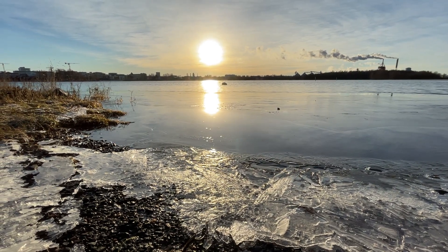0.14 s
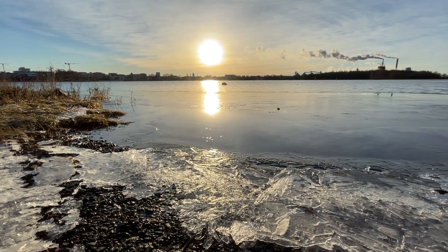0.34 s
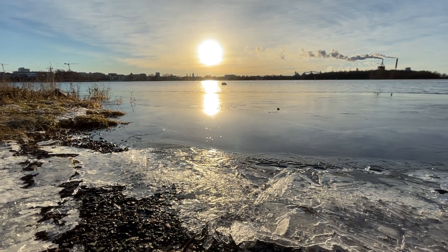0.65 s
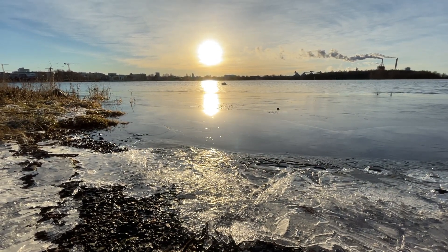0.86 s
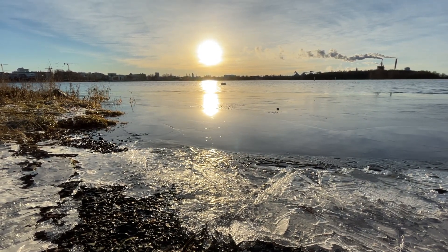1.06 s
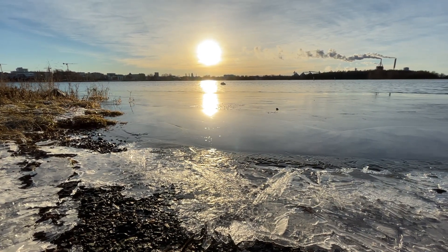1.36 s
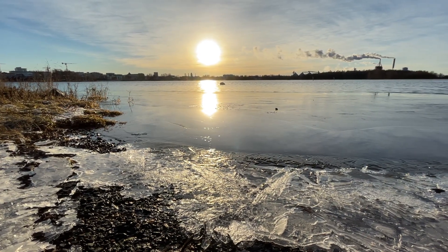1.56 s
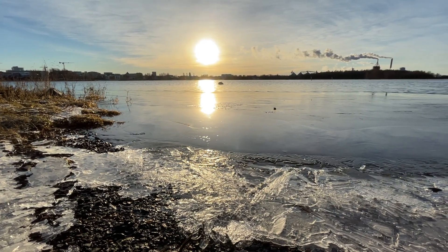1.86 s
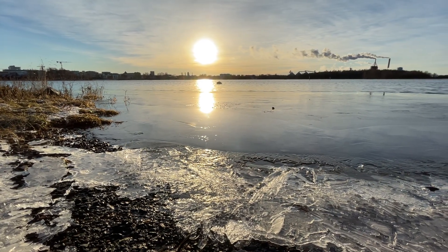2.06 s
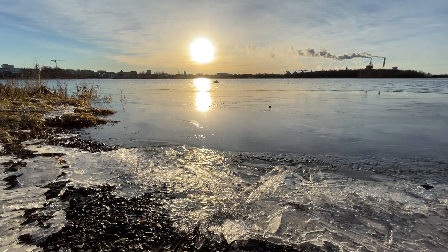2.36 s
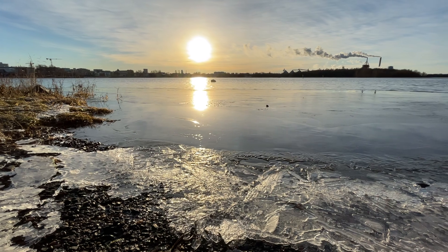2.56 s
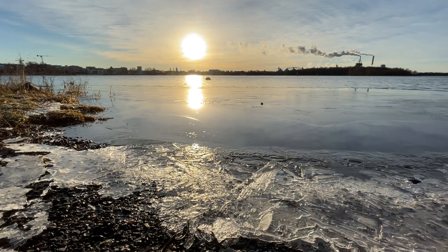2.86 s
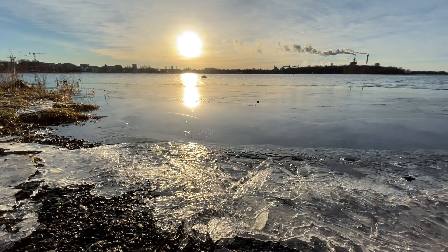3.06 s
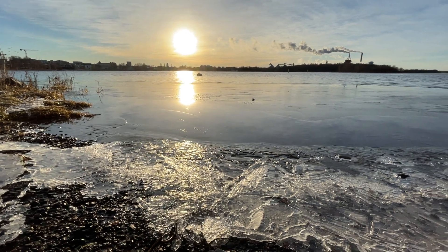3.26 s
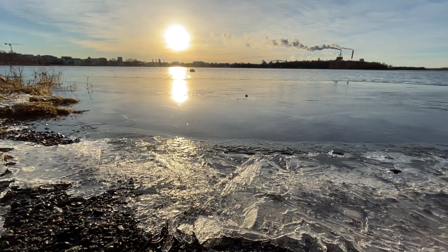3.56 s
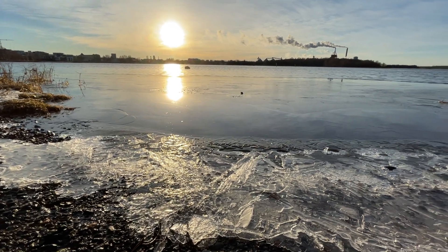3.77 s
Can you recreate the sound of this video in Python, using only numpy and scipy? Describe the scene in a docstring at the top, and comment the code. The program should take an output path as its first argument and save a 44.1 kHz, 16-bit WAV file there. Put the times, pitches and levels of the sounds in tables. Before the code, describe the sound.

Crackling sheet ice, heard close in wide stereo on an open shore: a delicate glassy fizz, then frequent brittle snaps, small bubbles and gurgles underneath, a bright plip near the end, low distant rumble behind.

```python
"""A fizzing wash of tiny ice ticks runs throughout, rising and falling as low swells lift thin ice along a shore.
Plates crack over it in bursts of a few milliseconds, shaped from noise in three ranges: body, snap and sparkle.
Air pockets plip, bubble and gurgle as short decaying sines under the ice.
Behind them lie a soft slosh, a faint two-tone hum and a low rumble of wind and distance, made of filtered noise
and wavering sines."""
import sys
import numpy as np
from scipy import signal
from scipy.fft import rfft, irfft
from scipy.io import wavfile
from scipy.ndimage import uniform_filter1d

SR = 44100
rng = np.random.default_rng(int(sys.argv[2]) if len(sys.argv) > 2 else 0)


def generate_wav(sig):
    """Save sig (samples, or channels by samples) to the path in sys.argv[1] as 16-bit PCM at SR."""
    pcm = np.round(np.clip(np.atleast_2d(sig).T, -1, 1) * 32767).astype(np.int16)
    wavfile.write(sys.argv[1], SR, pcm)


N = 172872  # length in samples

# In spectra, level/dB is relative density per Hz: colour() sets the overall gain.
# Swell of the ice, before layer trims: t/s, treble level/dB, upper-mid level/dB
SWELL_LEVELS = [(0, -62, -72), (.09, -64, -68), (.155, -58, -67), (.22, -68.5, -72.5), (.38, -72, -77),
                (.52, -66.5, -68), (.67, -59.5, -68.5), (.85, -60, -67), (1.0, -65.5, -67.5),
                (1.35, -64.5, -66), (1.55, -67.5, -69.5), (1.68, -73, -72.5), (1.79, -80.5, -83),
                (1.88, -70.5, -74), (1.97, -72.5, -76), (2.15, -70.5, -75.5), (2.25, -65, -65),
                (2.42, -59, -61.5), (2.62, -62.5, -66), (2.93, -55.5, -63), (3.04, -61.5, -63.5),
                (3.12, -66.5, -65), (3.25, -63.5, -66.5), (3.5, -59.5, -62), (3.92, -60.5, -61.5)]
# Spectra of the wash of ticks, treble and upper mids: f/Hz, level/dB
WASH_TREBLE_SPECTRUM = [(2500, -17.5), (5000, -3), (6500, -1), (8000, 2), (9700, 1.5), (11500, -2.5),
                        (13000, -1), (14300, -16), (15500, -27)]
WASH_MID_SPECTRUM = [(400, -14), (950, 3.5), (1400, -0.5), (2350, 4), (2750, 1), (3300, 0), (4100, 0.5),
                     (4950, -2.5), (5500, -2.5), (7500, -17.5), (12000, -37)]
# Shared part of left and right in the ice noise: f/Hz, likeness (0-1)
ICE_LIKENESS = [(1500, 0.25), (3500, 0.25), (5300, 0.54), (8000, 0.15), (9400, 0.081), (11800, 1),
                (15000, 0.18)]
# Phase of the shared noise on the left against the right: f/Hz, phase/rad
LEFT_PHASE = [(0, 0), (1380, -2.5), (2330, -4.5), (4050, -7), (5340, -11), (6460, -7), (7410, -7),
              (8100, -3.5), (8440, -5), (9990, 2.2), (10500, 1.2), (12300, -2), (14500, -5.5)]
# Cracking plates: t/s, body level/dB, snap level/dB, sparkle level/dB
PLATE_CRACKS = [(0.0523, -75, -58, -63), (0.1075, -73, -56, -55), (0.4307, -77, -57.5, -60),
                (0.5172, -65, -60, -64), (0.66, -78, -69, -57), (0.736, -65, -63, -53),
                (0.9544, -64, -64, -61), (1.0558, -72, -65, -55), (1.0736, -70, -57, -65),
                (1.082, -54, -55, -62), (1.1435, -63, -56, -50), (1.1878, -65, -54.5, -64),
                (1.1977, -72, -68, -53.5), (1.2376, -57, -53, -62), (1.2487, -52, -48.5, -50.5),
                (1.301, -59.5, -55.5, -56), (1.3464, -56, -49, -58), (1.349, -50.5, -46, -54),
                (1.372, -56, -51, -55), (1.4415, -66, -54.5, -58.5), (1.498, -68, -51.5, -54),
                (1.526, -59.5, -61, -56.5), (1.5892, -59.5, -61, -63), (1.608, -70, -65, -62),
                (1.647, -62, -57, -60), (1.7277, -72, -65.5, -64), (1.757, -75, -70, -61.5),
                (1.7963, -64, -64, -64.5), (1.8718, -56, -69, -73), (1.9708, -63, -62, -63),
                (1.9804, -59, -61, -62.5), (1.991, -58.5, -58, -60), (2.1004, -69, -55, -63),
                (2.1856, -67, -54.5, -62), (2.2225, -59, -49, -60), (2.2379, -51, -49, -53),
                (2.2553, -73, -53, -51), (2.331, -70, -63, -57), (2.364, -56, -59, -51.5),
                (2.3923, -66, -51.5, -56), (2.43, -52, -52, -58), (2.5053, -50, -51.5, -51.5),
                (2.7875, -54, -52, -45.5), (2.8033, -65, -67, -59), (2.893, -66, -57, -48),
                (2.923, -63, -56, -52), (2.9801, -68, -48.5, -60), (2.9915, -66, -56, -51),
                (3.035, -66, -57, -48), (3.112, -74, -56, -58), (3.1237, -63, -48.5, -66),
                (3.333, -53, -53, -55.5), (3.3722, -73, -66, -52), (3.473, -67, -69, -55),
                (3.5284, -67, -60, -55), (3.5732, -55, -51, -58), (3.614, -49.5, -51, -59),
                (3.6563, -58, -48, -49), (3.673, -57, -54.5, -51), (3.688, -62, -62, -53),
                (3.8075, -56, -70, -62), (3.82, -56, -65, -53), (3.893, -52, -48.5, -48)]
# Spectra of the three ranges of a fracture: f/Hz, level/dB
BODY_SPECTRUM = [(220, -26), (480, 3.5), (1000, 1), (2000, -8), (3200, -16), (8000, -22)]
SNAP_SPECTRUM = [(1200, -13.5), (2800, -3), (4200, 1), (5800, 0), (8000, -14), (14000, -19)]
SPARKLE_SPECTRUM = [(3500, -29), (6500, 1), (9800, 2.5), (12500, -6), (14000, 1), (15500, -24)]
# Water plips under an edge: t/s, starting f/Hz, ring level/dB before rise and decay,
# decay to 1/e in cycles of the starting pitch, lag of the left side/ms
WATER_PLIPS = [(0.2236, 1730, -42, 3.4, -0.16), (1.3513, 925, -48, 3.2, 0.25),
               (1.5899, 1830, -38.5, 1.8, 0.14), (1.5905, 3200, -41, 3, 0.16),
               (1.593, 1940, -36, 2.6, 0.16), (1.6352, 4100, -45, 3.7, 0.051), (1.9922, 840, -43, 2.3, .3),
               (2.206, 1630, -45, 4, 0.38), (3.334, 2670, -41, 5.3, 0.28), (3.187, 2630, -47, 8, 0.25),
               (3.6073, 2900, -29.5, 2.2, 0.0011), (3.6149, 2220, -19.5, 1.16, 0.072),
               (3.6158, 830, -39, 1.4, 0), (3.6153, 3900, -38, 2.5, 0.052), (3.693, 1870, -36.5, 1.8, 0.12),
               (3.741, 1540, -39, 1.6, 0.13), (3.8105, 2250, -41, 1.8, 0.074)]
# Spectrum of the click that starts a plip: f/Hz, level/dB
PLIP_CLICK_SPECTRUM = [(500, -8), (3500, 11), (5200, -27), (7500, 2.5), (10000, -8), (14000, -28)]
# Water shifting beneath the sheet: t/s, level/dB
SLOSH_LEVELS = [(0, -74), (.6, -63), (1.0, -64), (1.4, -57.5), (1.7, -65.5), (2.3, -59), (3.1, -72),
                (3.7, -63.5), (3.92, -59)]
# Spectrum of the slosh: f/Hz, level/dB
SLOSH_SPECTRUM = [(200, -1.5), (370, 8.5), (600, -1), (950, -11.5), (1600, -26), (4000, -45)]
# Far-off hum tones: f/Hz, rms level/dB
HUM_TONES = [(129, -65.5), (549, -74)]
# Spectrum of the wind and distance: f/Hz, level/dB
RUMBLE_SPECTRUM = [(24, -22), (33, -30), (42, 0.5), (70, -0.5), (105, -5), (130, -1), (155, -4.5),
                   (215, -4), (300, -11), (480, -15), (750, -23.5), (1200, -30.5), (2000, -46), (5000, -52)]
# Shared part of left and right in the rumble and slosh: f/Hz, likeness (0-1)
LOW_LIKENESS = [(60, 0.96), (130, 0.95), (280, 0.84), (550, 0.58), (1400, 0.03)]
# Tone balance between the sides: f/Hz, left minus right level/dB
SIDE_BALANCE = [(400, 0), (900, 1.5), (2800, 0), (5300, 1.5), (6500, -0.5), (8000, -1.5), (9500, -8),
                (11500, -0.5), (13000, -0.5)]

# Wash: trims against the swell levels, steady fizz against the ticks, rms flicker of each layer
TREBLE_TRIM_DB, MID_TRIM_DB, FIZZ_DB = -0.53, 1.14, -0.5
FLICKER_DB, MID_FLICKER_DB = 0.87, 2.7  # the second adds to the first in the upper mids
TICKS_PER_S, TICK_SPREAD_DB, TICK_DECAY_S = 1700, 2, 0.00021  # the swell scales the rate
PATCH_DB, PATCHES_PER_S = 2, 170  # fast colour changes of the ticks
COLOUR_DRIFT_DB, COLOUR_DRIFT_PER_S = 1.05, 7  # slow wander of the colour

# Fractures: times at full length; grit is the depth of unevenness, as an exponent
CRACK_RISE_S, CRACK_DECAY_S, CRACK_GRIT = 0.0023, 0.0016, 0.44
CRACK_TAIL_DB, CRACK_TAIL_S = -22, 0.0097
CRACK_SPAN_S = 0.0053  # table levels are the rms a crack would have if spread over this span
FULL_LENGTH_DB, DB_PER_LENGTH_DOUBLING = -45.5, 24  # weaker cracks are shorter
CRACKLES_PER_S, CRACKLE_SPREAD_DB, CRACKLE_LENGTH = 130, 3.0, 0.46
CRACKLE_DB, CRACKLE_FOLLOW = -68, 0.65  # base level; dB per dB of treble swell

# Water: glide is the phase bend, so pitch rises by twice this fraction per second
PLIP_CLICK_DB, PLIP_CLICK_DECAY_S, PLIP_RISE_S, GLIDE_PER_S = -13.5, 0.0011, 0.00017, 6.54
BUBBLES_PER_S, BUBBLE_LOW_HZ, BUBBLE_HIGH_HZ = 600, 1801, 11080
BUBBLE_CYCLES, BUBBLE_SPREAD_DB, BUBBLE_DB = 23, 5, -67  # middle decay in cycles; final rms in dB
GURGLES_PER_S, GURGLE_LOW_HZ, GURGLE_HIGH_HZ = 45, 370.3, 1100
GURGLE_CYCLES, GURGLE_SPREAD_DB, GURGLE_DB = 7.6, 3, -66
BUBBLE_LAG_S, GURGLE_LAG_S = 0.00029, 0.00058  # longest lag of either side

# Background
HUM_WAVER_DB, HUM_DRIFT_HZ = 2.5, 2.462
RUMBLE_DB, RUMBLE_GUST_DB = -49.5, 0.18
TOP_HZ = 15800


def undb(db):
    """Decibels to gain."""
    return 10 ** (np.asarray(db) / 20)


def unit(x):
    """Scale to rms 1."""
    return x / np.sqrt(np.mean(x ** 2))


def over_time(s, value):
    """Breakpoints in seconds joined by straight lines, sample by sample."""
    return np.interp(np.arange(N) / SR, s, value)


def along(points):
    """A (f/Hz, value) table read on a log frequency axis at every FFT bin."""
    hz, value = np.array(points, float).T
    bins = np.arange(N // 2 + 1) * SR / N + 1e-9
    return np.interp(np.log(bins), np.log(hz), value)


def colour(x, points):
    """Filter by a spectrum, keeping the power of white noise."""
    return irfft(rfft(x) * unit(undb(along(points))), N)


def walk(rate):
    """Random drift of rms near 1, moving in straight lines between values at this rate per second."""
    step = max(int(SR / rate), 1)
    held = np.repeat(rng.standard_normal(N // step + 1), step)
    return unit(uniform_filter1d(held, step)[:N])


def pair(likeness):
    """Stereo noise: a shared part with a phase offset on the left, plus a separate part on each side."""
    c = np.clip(likeness, 0, 1)
    shared, left, right = rfft(rng.standard_normal((3, N)))
    phase = np.interp(np.arange(N // 2 + 1) * SR / N, *np.array(LEFT_PHASE).T)
    common = np.array([shared * np.exp(1j * phase), shared])
    return irfft(np.sqrt(c) * common + np.sqrt(1 - c) * np.array([left, right]), N)


def showers(rate, spread_db):
    """Energies of impacts at random moments, with a bell-shaped spread of levels in dB."""
    chance = rng.random(N)
    size = np.clip(rng.standard_normal(N), -2, 2)
    return (chance < rate / SR) * undb(spread_db * size) ** 2


def envelope(energy, shape):
    """Amplitude of impacts that each spread their energy over one shape."""
    spread = signal.fftconvolve(energy, shape ** 2 / np.sum(shape ** 2))[:N]
    return np.sqrt(np.maximum(spread, 0))


def swell():
    """Treble and upper-mid levels in dB as the water lifts the ice."""
    s, high, low = np.array(SWELL_LEVELS).T
    return over_time(s, high), over_time(s, low)


def wash():
    """Countless decaying ice ticks over fizzing water, denser and louder as each swell arrives."""
    high, low = swell()
    t = np.arange(SR // 50) / SR
    busy = undb(high - high.mean())
    # Energy is divided by density here, so loudness is set by the swell levels alone.
    energy = showers(TICKS_PER_S * busy, TICK_SPREAD_DB) / busy
    ticks = unit(envelope(energy, np.exp(-t / TICK_DECAY_S)))
    grain = unit(pair(along(ICE_LIKENESS)) * np.hypot(ticks, undb(FIZZ_DB)))
    grain = grain * undb(FLICKER_DB * walk(35))
    treble = colour(grain, WASH_TREBLE_SPECTRUM) * undb(high + TREBLE_TRIM_DB)
    mid_db = low + MID_TRIM_DB + MID_FLICKER_DB * walk(25)
    return treble + colour(grain, WASH_MID_SPECTRUM) * undb(mid_db)


def patchy(x):
    """Give the ticks shifting colours: overlapping narrow bands rise and fall separately, and drift."""
    count = 18
    place = along([(900, 0), (2500, 4), (6000, 10), (15000, count - 1)])
    spectrum, out = rfft(x), 0
    for k in range(count):
        db = PATCH_DB * np.clip(walk(PATCHES_PER_S), -2, 2)
        db = db + COLOUR_DRIFT_DB * walk(COLOUR_DRIFT_PER_S)
        band = irfft(spectrum * np.maximum(1 - abs(place - k), 0), N)
        out = out + band * unit(undb(db))
    return out


def crack_shape(length):
    """A fracture runs for a moment and dies away, leaving a faint scatter; length stretches it."""
    t = np.arange(SR // 16) / SR / length
    rise = 1 - np.exp(-(t / CRACK_RISE_S) ** 2)
    scatter = undb(CRACK_TAIL_DB) * np.exp(-t / CRACK_TAIL_S)
    return rise * (np.exp(-t / CRACK_DECAY_S) + scatter)


def splinters():
    """The fine, uneven grain inside a fracture: stereo noise with a rapidly wandering level."""
    grit = np.exp(CRACK_GRIT * np.clip(walk(2200), -2, 2))
    return unit(pair(along(ICE_LIKENESS)) * grit)


def cracks():
    """Clear fractures: bursts of splinters in three ranges, longer when stronger."""
    power = np.zeros((3, N + SR))
    for s, *db in PLATE_CRACKS:
        length = 2 ** ((max(db) - FULL_LENGTH_DB) / DB_PER_LENGTH_DOUBLING)
        shape = crack_shape(length) ** 2
        i = int(s * SR)
        power[:, i:i + len(shape)] += np.outer(undb(db) ** 2, shape / shape.sum()) * CRACK_SPAN_S * SR
    out = 0
    for p, spectrum in zip(power, (BODY_SPECTRUM, SNAP_SPECTRUM, SPARKLE_SPECTRUM)):
        out = out + colour(np.sqrt(p[:N]) * splinters(), spectrum)
    return out


def crackle():
    """Small random fractures throughout, louder as the swell rises, their three ranges varying separately."""
    high, _ = swell()
    energy = showers(CRACKLES_PER_S, CRACKLE_SPREAD_DB)
    out = 0
    for spectrum, db in ((BODY_SPECTRUM, -5), (SNAP_SPECTRUM, -1), (SPARKLE_SPECTRUM, 1.5)):
        varied = energy * undb(0.96 * walk(200)) ** 2
        env = unit(envelope(varied, crack_shape(CRACKLE_LENGTH)))
        out = out + undb(db) * colour(env * splinters(), spectrum)
    return out * undb(CRACKLE_DB + CRACKLE_FOLLOW * (high - high.mean()))


def plips():
    """Small air pockets ring for a few cycles, rising a little in pitch, with a tiny noise click at the start."""
    rings, clicks, size = np.zeros((2, N)), np.zeros((2, N)), SR // 25
    for s, hz, db, cycles, lag_ms in WATER_PLIPS:
        lag = np.array([[max(lag_ms, 0)], [max(-lag_ms, 0)]]) / 1000  # left, right
        t = np.maximum(np.arange(size) / SR - lag, 0)
        i = int(s * SR)
        onset = undb(db) * (1 - np.exp(-t / PLIP_RISE_S))
        tone = np.sin(2 * np.pi * hz * t * (1 + GLIDE_PER_S * t))
        rings[:, i:i + size] += onset * tone * np.exp(-t * hz / cycles)
        clicks[:, i:i + size] += onset * rng.standard_normal(size) * np.exp(-t / PLIP_CLICK_DECAY_S)
    return rings + undb(PLIP_CLICK_DB) * colour(clicks, PLIP_CLICK_SPECTRUM)


def bubbles():
    """Tiny bubbles, each a decaying sine with its own pitch and place, ring in the wash."""
    high, low = swell()
    t = np.arange(SR // 50) / SR
    out = np.zeros((2, N + len(t)))
    for when, p, size, pan, length in rng.random((int(BUBBLES_PER_S * N / SR), 5)):
        i = int(when * N)
        hz = BUBBLE_LOW_HZ + (BUBBLE_HIGH_HZ - BUBBLE_LOW_HZ) * p
        # Low bubbles follow the upper-mid swell, high ones the treble.
        db = low[i] + p * (high[i] - low[i]) + BUBBLE_SPREAD_DB * min(-np.log(1 - size), 2)
        late = np.maximum(t - BUBBLE_LAG_S * np.array([[pan], [1 - pan]]), 0)
        decay = np.exp(-late * hz / (BUBBLE_CYCLES * (.5 + length)))
        out[:, i:i + len(t)] += undb(db) * np.sin(2 * np.pi * hz * late) * decay
    return unit(out[:, :N]) * undb(BUBBLE_DB)


def gurgles():
    """Larger air pockets knock as short rising sines, louder with the slosh; higher ones are fainter."""
    t = np.arange(SR // 12) / SR
    out = np.zeros((2, N + len(t)))
    for when, p, size, pan in rng.random((int(GURGLES_PER_S * N / SR), 4)):
        i = int(when * N)
        hz = GURGLE_LOW_HZ * (GURGLE_HIGH_HZ / GURGLE_LOW_HZ) ** p
        slosh_db = np.interp(i / SR, *np.array(SLOSH_LEVELS).T)
        db = .5 * slosh_db + GURGLE_SPREAD_DB * min(-np.log(1 - size), 2)
        late = np.maximum(t - GURGLE_LAG_S * np.array([[pan], [1 - pan]]), 0)
        tone = np.sin(2 * np.pi * hz * late * (1 + GLIDE_PER_S * late))
        out[:, i:i + len(t)] += undb(db) / np.sqrt(hz) * tone * np.exp(-late * hz / GURGLE_CYCLES)
    return unit(out[:, :N]) * undb(GURGLE_DB)


def slosh():
    """Water shifts softly beneath the sheet: low filtered noise on a moving level."""
    level_db = over_time(*np.array(SLOSH_LEVELS).T) + 1.35 * walk(18)
    return colour(pair(along(LOW_LIKENESS)), SLOSH_SPECTRUM) * undb(level_db)


def hum():
    """Two faint sines from far across the water, wavering in pitch and level."""
    out = 0
    for hz, db in HUM_TONES:
        phase = 2 * np.pi * np.cumsum(hz + HUM_DRIFT_HZ * walk(8)) / SR
        out = out + undb(db) * unit(np.sin(phase) * undb(HUM_WAVER_DB * walk(5.2)))
    return out


def rumble():
    """Nearly steady low wind and far-off noise, alike on both sides in the bass."""
    noise = unit(colour(pair(along(LOW_LIKENESS)), RUMBLE_SPECTRUM))
    return noise * undb(RUMBLE_DB + RUMBLE_GUST_DB * walk(5.26))


def scene():
    """Ice and water over the background."""
    ice = patchy(wash() + crackle()) + cracks()
    water = plips() + bubbles() + gurgles() + slosh()
    return ice + water + hum() + rumble()


def record(dry):
    """Two microphones of unequal tone balance, the difference split between them; the top is cut."""
    balance_db = along(SIDE_BALANCE) * np.array([[.5], [-.5]])
    heard = irfft(rfft(dry) * undb(balance_db), N)
    return signal.sosfilt(signal.ellip(8, .2, 70, TOP_HZ, fs=SR, output="sos"), heard)


dry = scene()
out = record(dry)
generate_wav(out)
```